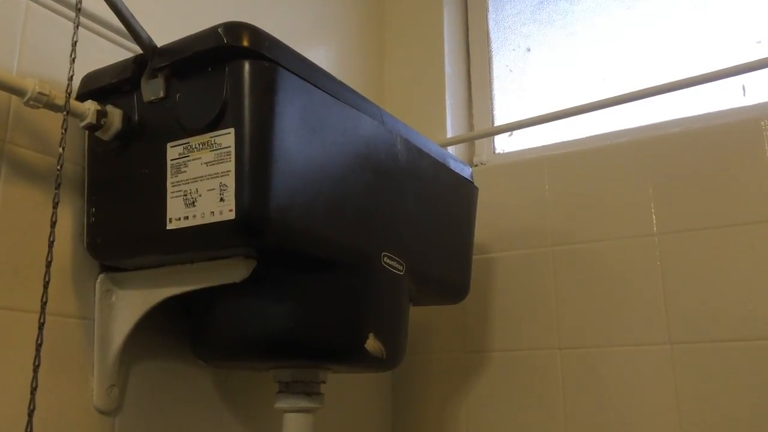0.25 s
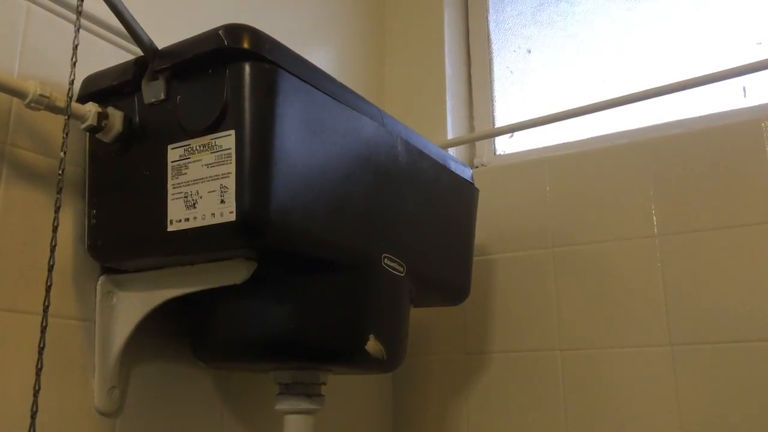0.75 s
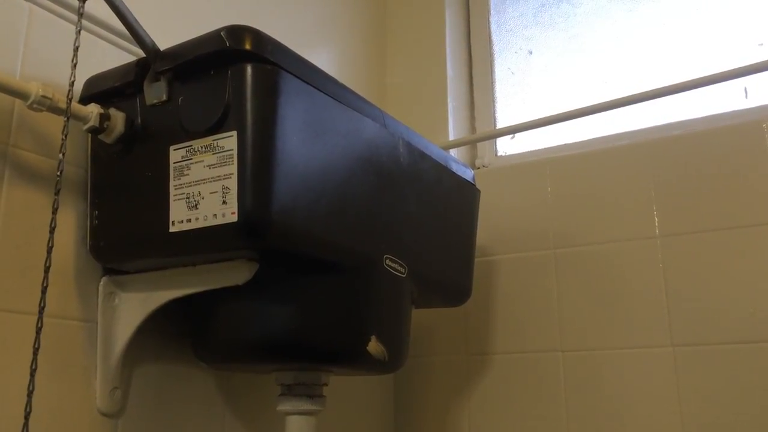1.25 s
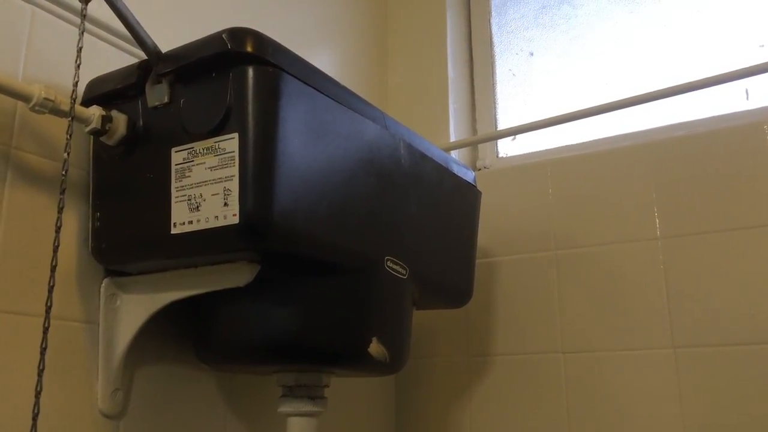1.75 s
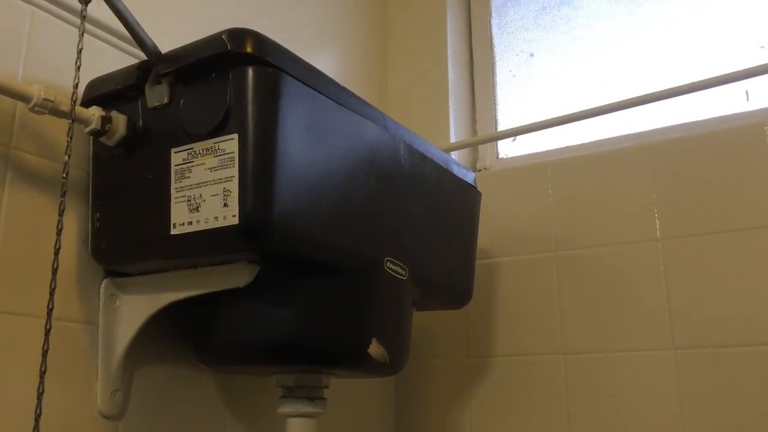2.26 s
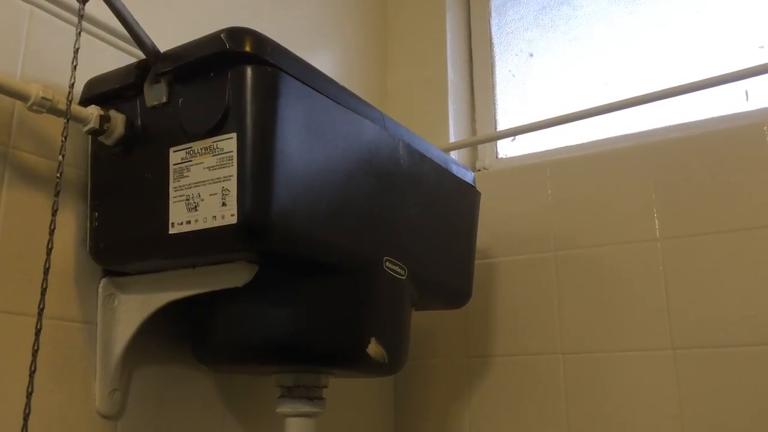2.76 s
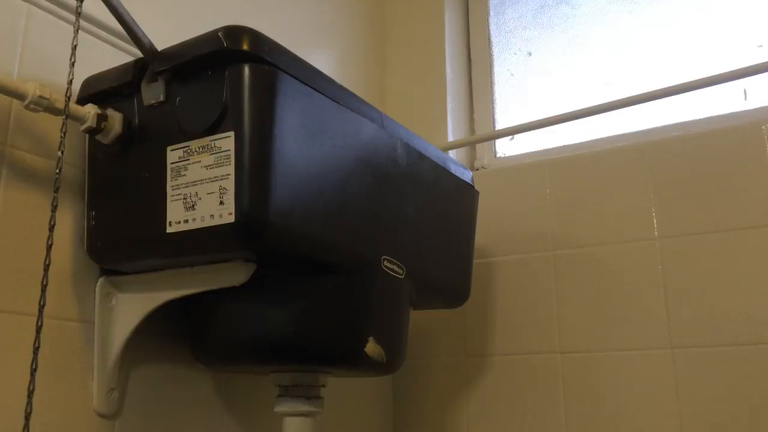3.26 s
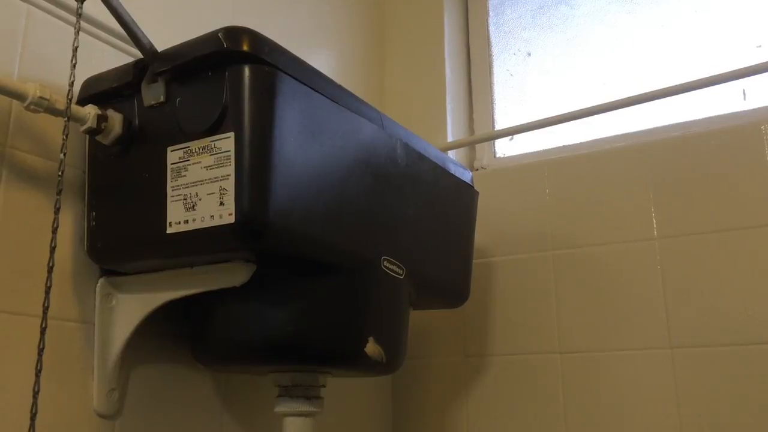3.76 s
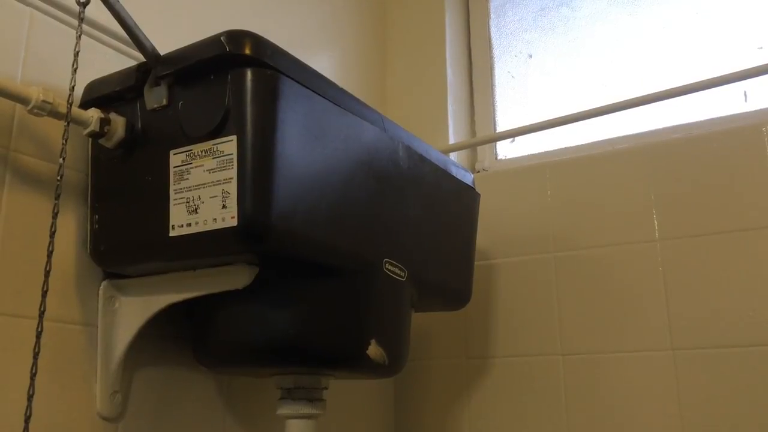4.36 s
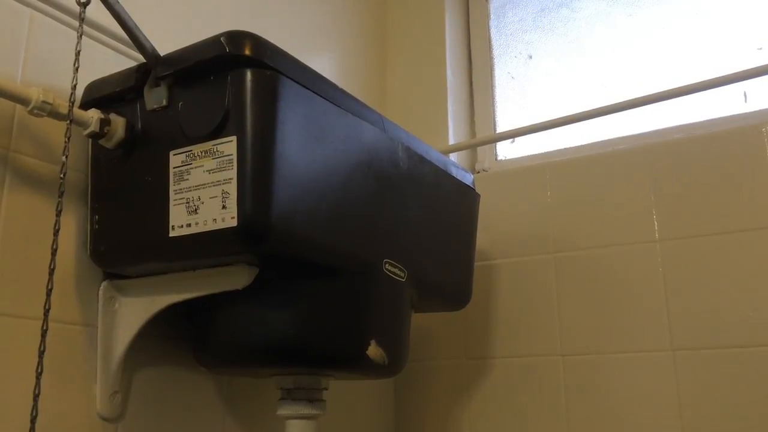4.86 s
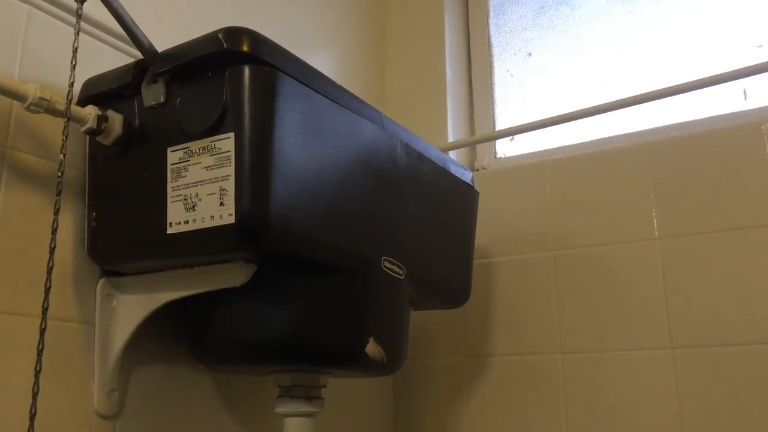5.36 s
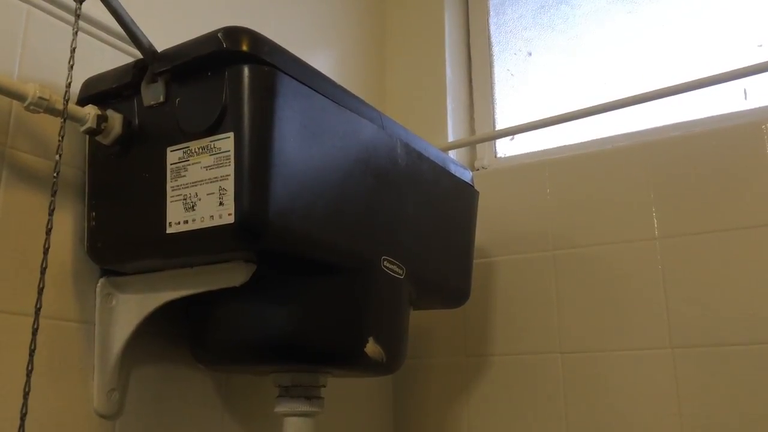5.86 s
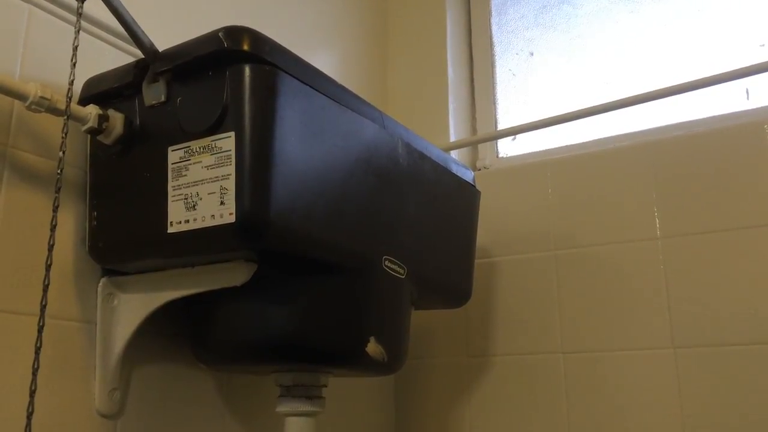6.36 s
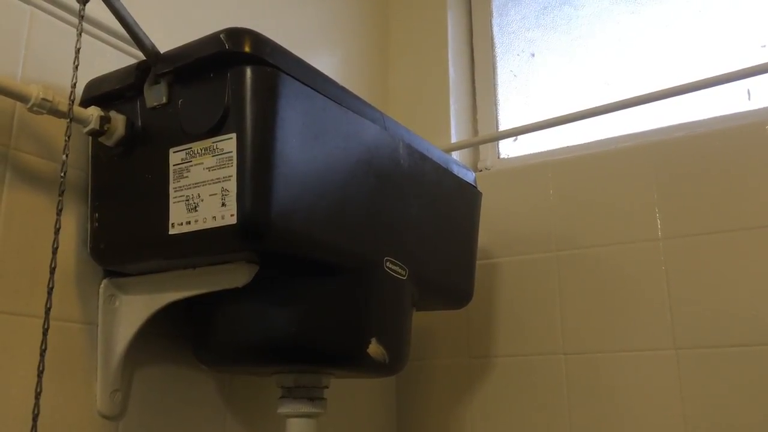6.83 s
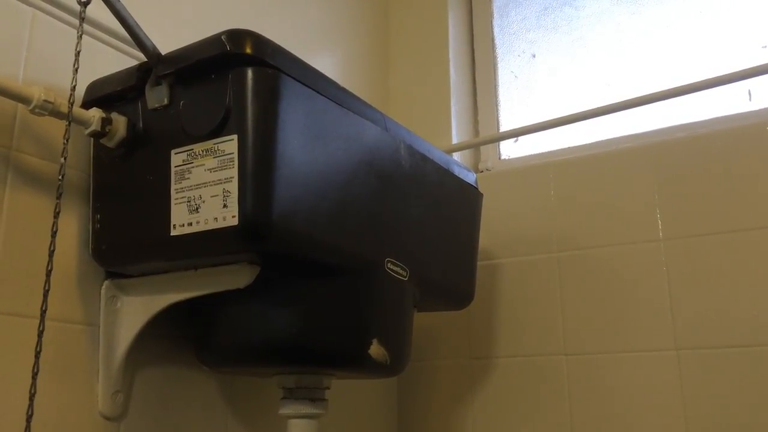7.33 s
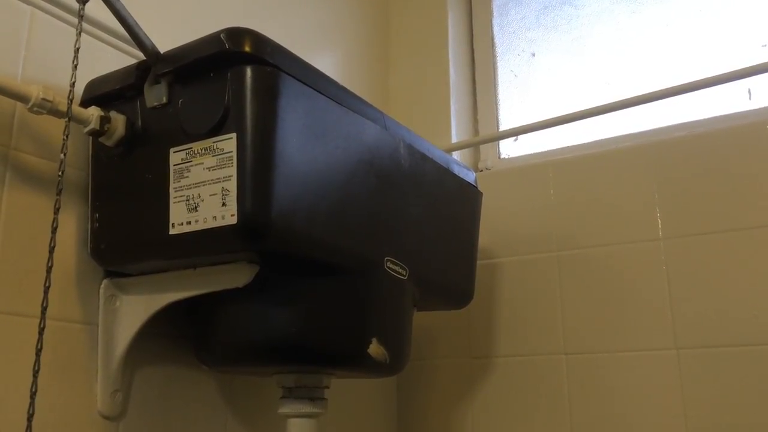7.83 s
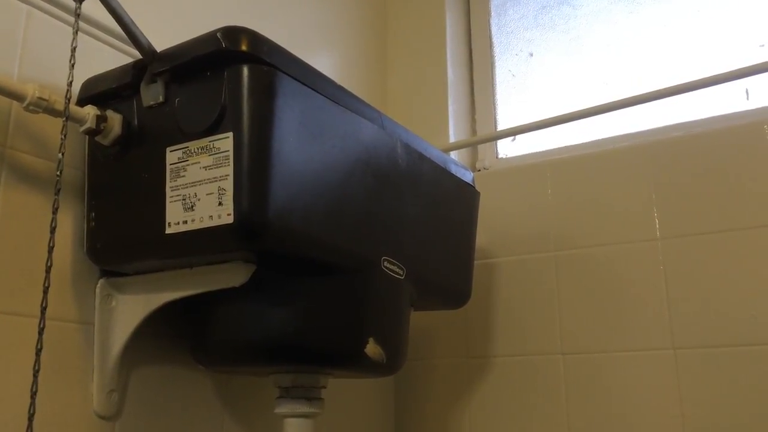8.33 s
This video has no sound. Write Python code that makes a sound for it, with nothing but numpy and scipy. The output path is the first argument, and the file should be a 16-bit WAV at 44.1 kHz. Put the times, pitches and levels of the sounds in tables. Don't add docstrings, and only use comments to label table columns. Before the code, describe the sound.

Close view of a wall-mounted toilet cistern filling in a small tiled room. Bright, sprayy hiss and watery churn run throughout, with a hollow breathy tone and pulsing metallic singing early on. The singing stops, then a thin jittery whistle locks in, flares and creeps upward. Finally it blurs and the hiss weakens. A soft tap comes early, a faint double tap near the end and a dull thud last.

```python
import sys
import numpy as np
from scipy import signal
from scipy.fft import rfft, irfft, next_fast_len
from scipy.io import wavfile
from scipy.ndimage import uniform_filter1d, map_coordinates

SR = 44100
rng = np.random.default_rng(int(sys.argv[2]) if len(sys.argv) > 2 else 0)


def nominal_scale(level):
    x = np.asarray(level, float) / 20
    return 10 ** x


def wrap_up_sound(samples):
    columns = np.atleast_2d(samples).T
    tamed = np.clip(columns, -1, 1)
    steps = np.round(tamed * 32767).astype(np.int16)
    wavfile.write(sys.argv[1], SR, steps)


N = 378819
T = np.arange(N) / SR

# time in seconds, hiss level in dB.
FLOW = [
    (0, -45),
    (1.5, -45.5),
    (3.5, -46),
    (5, -46.5),
    (6.5, -48.5),
    (7.5, -50.5),
    (8.59, -53.5),
]
# frequency in Hz, density in dB per Hz.
HISS_SPECTRUM = [(2200, -28.5), (3000, -18.5), (3500, 5.5), (4000, 2), (4500, -3), (6000, -3.5), (7800, -4),
                 (9000, -10), (12000, -22), (16000, -38)]
SPRAY_SPECTRUM = [(4000, -34.5), (7000, -4.5), (9000, -2), (11000, -2.5), (13000, -6), (15200, -9.5),
                  (17000, -29)]
CHURN_SPECTRUM = [(300, -61), (400, -10), (600, -37), (1000, -19), (1500, -19), (2000, -2.5), (2400, 1.5),
                  (3000, -4.5), (4000, -27.5), (6000, -48)]
HUM_SPECTRUM = [(12, -50), (25, -16), (40, -3), (102, 1.5), (150, -5.5), (180, -2), (220, 0), (270, -5.5),
                (468, -15), (906, -16.5), (1260, -16.5), (1600, -9), (2080, -11), (3520, -120)]
# centre in Hz, width in Hz.
HOLLOW_MODE = (2959, 410)
GUSH_MODE = (6050, 460)
# time in seconds, pitch in Hz, width in Hz, level in dB.
WHISTLE = [(0, 3540, 482, -45.5), (1, 3330, 417, -49), (2, 3320, 320, -47), (3, 3388, 200, -45.5),
           (4, 3402, 129, -43), (4.7, 3468, 98, -40.5), (5.4, 3519, 104.1, -42), (6.1, 3542, 126, -42),
           (6.6, 3558, 159.6, -45.5), (7, 3650, 236, -48), (7.4, 3705, 300, -47.5), (8, 3940, 278, -49),
           (8.59, 3970, 260, -52)]
# onset start, onset end, release start, release end, all in seconds.
LOCK_S = (3.2, 3.6, 6.5, 6.9)
# time in seconds, added peak in dB relative to its usual level.
FLARES = [(3.58, -8), (3.92, -2), (4.05, 6), (4.14, 9), (4.41, 0), (4.55, 0), (4.9, -8), (4.96, -1),
          (5.29, 10), (5.61, 4), (5.72, 3), (5.99, 1), (6.12, 3), (6.26, 4), (6.48, 4), (6.6, 6)]
# frequency in Hz, wander in Hz.
RUNGS = [(3425, 30), (3511, 10), (3640, 12), (3862, 14), (4010, 20)]
# frequency in Hz, width in Hz, level at the start in dB, slope in dB per second.
DRONES = [(112, 5, -71.5, -.3), (147, 2, -81, 0), (470, 40, -80, -3), (1741, 14, -72, -1.5),
          (1845, 16, -88, 1.1), (3068, 14, -58, -3)]
# time in seconds, peak in dB.
THROBS = [(.02, -62), (.24, -60), (.45, -64), (.68, -63), (1.2, -60.5), (1.45, -70), (1.79, -62),
          (2.2, -65), (2.41, -59.5), (2.78, -63), (2.97, -61), (3.31, -58), (3.5, -62.5), (3.92, -67),
          (4.13, -66), (4.35, -68), (4.65, -76), (4.83, -67), (4.96, -73), (5.15, -64), (5.36, -71),
          (5.53, -68), (5.9, -68), (6.21, -68.5), (6.39, -66), (6.69, -66), (6.88, -62), (7.46, -62),
          (7.71, -74), (8.57, -66)]
# time in seconds, peak in dB.
SINGS = [
    (.32, -42.5),
    (.51, -64),
    (.86, -50),
    (1.12, -40),
    (1.29, -47),
]
# time in seconds, frequency in Hz, length in cycles, peak in dB.
KNOCKS = [
    (0.818, 560, 1.3, -59),
    (7.945, 430, 2, -65),
    (7.958, 450, 1.5, -59),
    (8.567, 63, 0.83, -52),
]
# centre in Hz, width in Hz,
# gain in dB.
FIXED_MODES = [(285, 70, -4.3), (355, 30, -2.4), (474, 70, 6.6), (495, 20, 3.6), (538, 70, -3.4),
               (598, 45, -2.4), (700, 20, 6.3), (786, 45, -2.8), (834, 45, 3.6), (867, 20, 3.1),
               (921, 70, -2.6), (1007, 45, -2.6), (1082, 70, 9.9), (1179, 70, 1.6), (1238, 45, -4.3),
               (1303, 70, -6.5), (1373, 45, 9.2), (1453, 20, -3.2), (1470, 20, 9.3), (1497, 20, 6.1),
               (1523, 20, -5.3), (1593, 70, -3.6), (1642, 30, 5.7), (1723, 20, -2.9), (1766, 30, -4.3),
               (1841, 45, 6.1), (1933, 30, 6.9), (2008, 70, -2.7), (2051, 20, 3.5), (2078, 30, -5.9),
               (2132, 20, -4.4), (2218, 70, 6.8), (2277, 20, -4.4), (2320, 20, -2.7), (2358, 30, 1.9),
              (2428, 20, -4.7), (2455, 30, 4.3), (2519, 45, -5.1), (2557, 20, -2.1), (2579, 20, 2.4),
              (2616, 30, -3.5), (2676, 20, 2.4), (2697, 20, -2.1), (2719, 20, 2.1), (2735, 20, -3.5),
              (2756, 30, 5.0), (2821, 20, 2.1), (2859, 70, 2.8), (2955, 70, -3.3), (2988, 20, -2.5),
              (3009, 20, 3.2), (3068, 70, 4.6), (3112, 20, 2.5), (3160, 45, -2.9), (3246, 70, -2.9),
              (3284, 20, 2.2),
               (3321, 20, 5.7), (3359, 20, -5.7), (3375, 30, -1.7), (3408, 45, 3.2), (3488, 20, -2.3),
             (3515, 45, 4.7), (3601, 20, -3.2), (3639, 20, 4.7), (3698, 30, -3.8), (3725, 20, 2.5),
             (3774, 45, -4.2), (3817, 20, 2.3), (3865, 45, 3.1), (3914, 30, -4.3), (3951, 30, 2.6),
             (3978, 20, -2.2), (4011, 30, 3.9), (4064, 30, -4.9), (4134, 45, 4.0), (4177, 20, 2.2),
             (4204, 20, -2.1), (4242, 70, -3.2), (4339, 30, 6.7), (4425, 70, -2.5), (4463, 20, 2.1),
             (4490, 45, 3.4), (4517, 20, -2.6), (4592, 20, -4.2), (4630, 20, 2.2), (4700, 20, 2.7),
               (4953, 45, 5.2), (5006, 30, -4.6), (5281, 45, -3.8), (5335, 45, 4.9), (5432, 45, -3.6),
             (5798, 45, 5.2), (6158, 45, 5.0), (7284, 110, -2.1), (7424, 70, 4.4), (7698, 45, 3.3),
             (7957, 30, 4.1), (8226, 45, 3.3), (9028, 30, -3.9), (9722, 70, 3.1), (9803, 45, -5.2),
             (10567, 70, -2.7), (11003, 45, 3.7), (12845, 45, -4.4), (13071, 70, 3.5), (13178, 110, -4.9),
             (13399, 45, 4.6), (13668, 45, 4.2), (13851, 110, -2.1), (13980, 30, -3.9), (14034, 45, 3.2),
             (14137, 110, -3.6), (14320, 70, 3.5), (14454, 110, -3.5), (14739, 45, -4.1), (14863, 45, -4.4)]
# frequency in Hz, threshold in dB.
GATE_LIMITS = [(4600, -12), (7000, -6), (9000, -4), (11000, -3), (12500, -3), (13200, -3.2), (13800, -2),
               (14500, -1.3)]
# time in seconds, offset in dB.
GATE_OFFSETS = [(0, -1.3), (1.4, -1), (1.75, 0), (6.2, 0), (6.7, .5), (7.2, 0), (7.6, -.8), (8.59, -1.3)]
# time in seconds, low edge in Hz, high edge in Hz, level in dB.
SPLITS = [(.125, 5150, 7000, -51), (.381, 7500, 9050, -57), (.381, 13000, 15000, -64),
          (.474, 10300, 11800, -62), (.892, 8900, 10400, -63), (1.797, 11000, 12500, -64),
          (2.122, 5600, 7000, -52), (3.283, 4200, 5800, -55), (3.701, 9600, 12500, -59),
          (4.375, 6200, 8400, -55), (6.023, 8230, 9710, -61), (6.581, 7470, 8960, -63),
          (7.602, 6200, 7800, -61), (8.575, 4570, 5800, -62)]


def unit(x):
    return x / np.sqrt(np.mean(x ** 2) + 1e-20)


def curves(rows, t=T):
    s, *cols = np.transpose(rows)
    return [np.interp(t, s, c) for c in cols]


def after(start_s):
    return np.clip(T - start_s, 0, None)


def wobble(rate_hz):
    knots = rng.standard_normal(int(N * rate_hz / SR) + 4)
    return map_coordinates(knots, [T * rate_hz])


def smooth(field, bins, frames):
    return uniform_filter1d(uniform_filter1d(field, size=bins, axis=0), size=frames, axis=1)


def filtered(x, response):
    m = next_fast_len(len(x) + 8192)
    return irfft(rfft(x, m) * response(np.fft.rfftfreq(m, 1 / SR)), m)[:len(x)]


def rush(spectrum, patchy_db):
    z = signal.stft(rng.standard_normal(N), nperseg=512)[2]
    patches = unit(smooth(rng.standard_normal(z.shape), bins=8, frames=10))
    x = signal.istft(z * nominal_scale(patchy_db * patches), nperseg=512)[1][:N]
    f, db = np.transpose(spectrum)
    return unit(filtered(x, lambda hz: nominal_scale(np.interp(np.log(hz + 1), np.log(f + 1), db))))


def band(centre_hz, width_hz, skirt):
    hz, t, z = signal.stft(rng.standard_normal(N), SR, nperseg=2048, noverlap=1536)
    offset = (hz[:, None] - centre_hz(t)) / (width_hz(t) / 2)
    shape = (1 + offset ** 2) ** -skirt
    shape = shape / np.sqrt(np.mean(shape ** 2, axis=0))
    return unit(signal.istft(z * shape, SR, nperseg=2048, noverlap=1536)[1][:N])


def drone(centre_hz, width_hz):
    return unit(filtered(rng.standard_normal(N), lambda hz: 1 / (1 + ((hz - centre_hz) / width_hz) ** 2)))


def tone(hz):
    return np.sqrt(2) * np.sin(2 * np.pi * np.cumsum(hz) / SR)


def swells(rows, length_s, bed_db):
    return nominal_scale(bed_db) + sum(nominal_scale(db) * np.exp(-((T - s) / length_s) ** 2) for s, db in rows)


def hiss(flutter):
    flow_db, = curves(FLOW)
    return nominal_scale(flow_db + 1.5 + 0.24 * flutter) * rush(HISS_SPECTRUM, patchy_db=0.71)


def spray(flutter):
    flow_db, = curves(FLOW)
    level_db = -52.32 + 0.61 * (flow_db - flow_db.max())
    return nominal_scale(level_db + 0.38 * flutter) * rush(SPRAY_SPECTRUM, patchy_db=0.6)


def churn(flutter):
    drowns_s, floor_db = 5.46, -62.5
    level_db = np.maximum(-51.5 - 1.4 * T - 4 * after(drowns_s), floor_db)
    return nominal_scale(level_db + 0.25 * flutter) * rush(CHURN_SPECTRUM, patchy_db=1.16)


def hollow(flutter):
    holds_s, drop_s, drop_db, fade_db_per_s = 1.48, 1.92, 8.5, 2.5
    late_s = after(holds_s)
    drop = drop_db * np.clip(late_s / drop_s, 0, 1)
    fade = fade_db_per_s * np.clip(late_s - drop_s, 0, None)
    level_db = -46.5 - drop - fade + 2.0 * wobble(12)
    centre_hz, width_hz = HOLLOW_MODE
    air = band(lambda t: centre_hz + 0 * t, lambda t: width_hz + 0 * t, skirt=1.0)
    octave = unit(filtered(air ** 2, lambda hz: hz > 4500))
    return nominal_scale(level_db + 0.6 * flutter) * (air + nominal_scale(-18) * octave)


def gush():
    holds_s, fade_db_per_s = 2.5, 10
    return nominal_scale(-53.5 - fade_db_per_s * after(holds_s)) * drone(*GUSH_MODE)


def jet():
    flutter = wobble(18)
    return hiss(flutter) + spray(flutter) + churn(flutter) + hollow(flutter) + gush()


def woken_modes(pitch_hz):
    reach_hz, starts_s = 92, 2.3
    total = 0
    for hz, wander_hz in RUNGS:
        nearness = 1 / (1 + ((pitch_hz - hz) / reach_hz) ** 2)
        total = total + nominal_scale(1.2 * wobble(30)) * tone(hz + wander_hz * wobble(40)) * nearness
    return nominal_scale(-8) * np.clip(2 * (T - starts_s) + 1, 0, 1) * total


def locked_tone(pitch_hz, level_db, locked):
    flare = swells(FLARES, length_s=0.013, bed_db=0)
    wander_hz = 12.07 * wobble(15) + 22 * wobble(60)
    return locked * flare * nominal_scale(level_db - 9 + 1.5 * wobble(30)) * tone(pitch_hz + wander_hz)


def whistle():
    pitch_hz, width_hz, level_db = curves(WHISTLE)
    locked = np.interp(T, LOCK_S, [0, 1, 1, 0])
    breathy = band(lambda t: curves(WHISTLE, t)[0], lambda t: curves(WHISTLE, t)[1], skirt=0.83)
    octave_db = -13 - 4 * np.clip(T - 4.1, 0, 3)
    octave = nominal_scale(octave_db) * tone(2 * pitch_hz + 0.64 * width_hz * wobble(60))
    gain = nominal_scale(level_db - 1.5 - 1.74 * locked + 0.28 * wobble(16))
    return gain * (breathy + woken_modes(pitch_hz) + octave) + locked_tone(pitch_hz, level_db, locked)


def wall_rumble():
    return nominal_scale(-66 + 0.01 * T + 0.2 * wobble(6.5)) * rush(HUM_SPECTRUM, patchy_db=1.0)


def faint_drones():
    return sum(nominal_scale(db + db_per_s * T) * drone(hz, width_hz) for hz, width_hz, db, db_per_s in DRONES)


def pipe_throbs():
    line = tone(205.5 + 1.5 * wobble(6)) + 0.4 * drone(214, 14)
    return nominal_scale(-2.5) * swells(THROBS, length_s=0.05, bed_db=-69) * line


def tank_song():
    ends_s = 2.3
    ending = nominal_scale(-5 - 30 * np.clip(T - ends_s, 0, 2))
    return ending * swells(SINGS, length_s=0.048, bed_db=-50.5 - T) * tone(2840 + 9 * wobble(25))


def knocks():
    total = 0
    for s, hz, cycles, db in KNOCKS:
        bell = np.exp(-((T - s) * hz / cycles) ** 2)
        total = total - nominal_scale(db) * bell * np.cos(2 * np.pi * hz * (T - s))
    return total


def fittings(hz):
    modes = FIXED_MODES
    modes_db = sum(db / (1 + ((hz - centre) / (width / 2)) ** 2) ** 2 for centre, width, db in modes)
    ripple = map_coordinates(rng.standard_normal(1000), [hz / 22])
    ripple_db = np.interp(hz, [4000, 5000, 14000], [0.4, 1.2, 1.8]) * ripple
    return nominal_scale(1.17 * modes_db + ripple_db)


def scene():
    rumble = wall_rumble() + faint_drones() + pipe_throbs() + tank_song()
    mono = filtered(jet() + whistle() + rumble, fittings) + knocks()
    return np.array([mono, mono])


def gate_weak_spots(x):
    hz, t, z = signal.stft(x, SR, nperseg=1024, noverlap=768)
    power = np.abs(z) ** 2
    limit_db = np.interp(hz, *np.transpose(GATE_LIMITS), left=-99)[:, None] + curves(GATE_OFFSETS, t)[0]
    keep = smooth(power, bins=3, frames=8) > nominal_scale(2 * limit_db) * smooth(power, bins=30, frames=12)
    return signal.istft(z * keep, SR, nperseg=1024, noverlap=768)[1][:N]


def side_bursts():
    length = 2048
    side = np.zeros(N + length)
    bell = np.sin(np.pi * np.arange(length) / length)
    for s, low_hz, high_hz, db in SPLITS:
        puff = unit(filtered(rng.standard_normal(length), lambda hz: (hz > low_hz) & (hz < high_hz)))
        side[round(s * SR) - length // 2:][:length] += nominal_scale(db) * puff * bell
    return side[:N]


def roll_off(x):
    return signal.sosfilt(signal.butter(12, 15310, fs=SR, output="sos"), x)


def record(dry):
    mix = gate_weak_spots(dry[0]) + side_bursts() * [[1], [-1]]
    return roll_off(mix)


dry = scene()
out = record(dry)
wrap_up_sound(out)
```